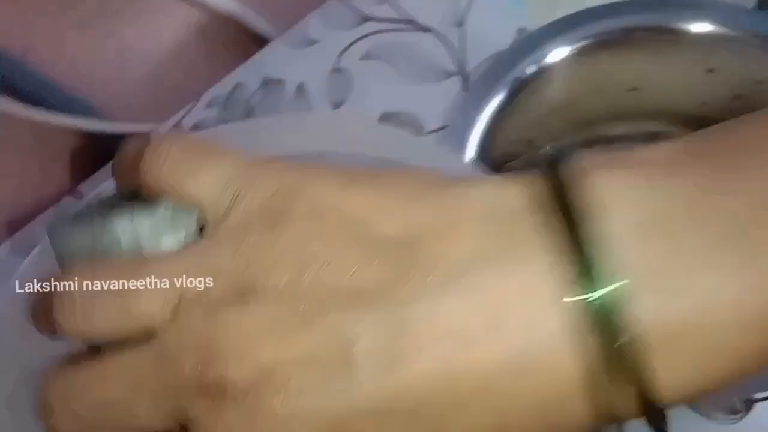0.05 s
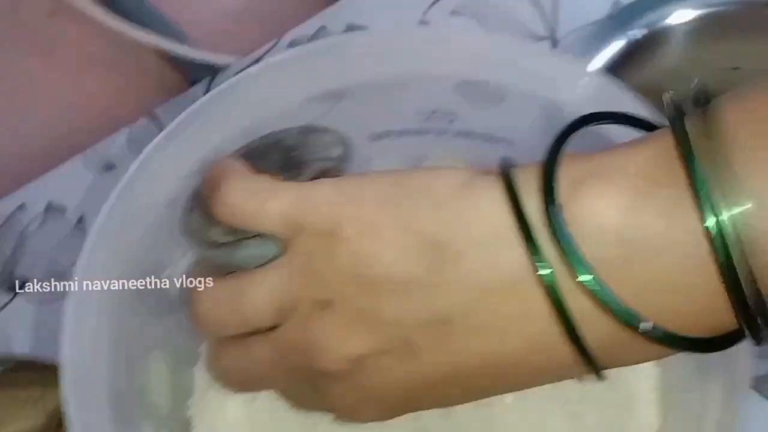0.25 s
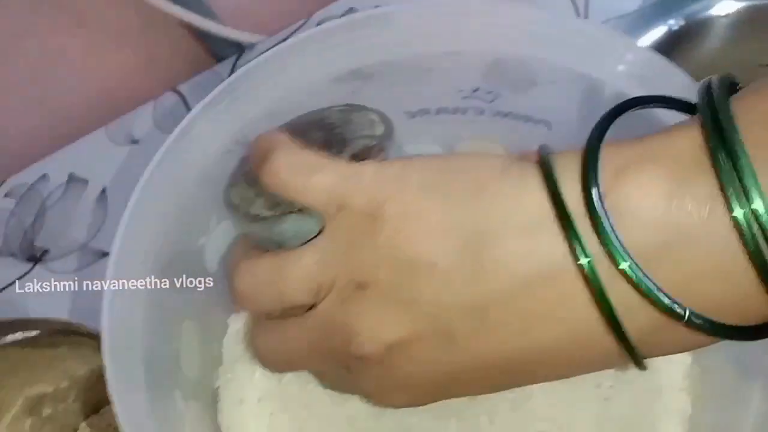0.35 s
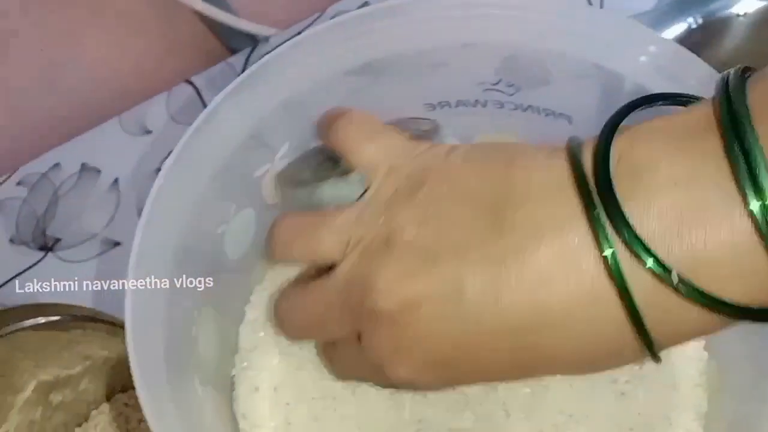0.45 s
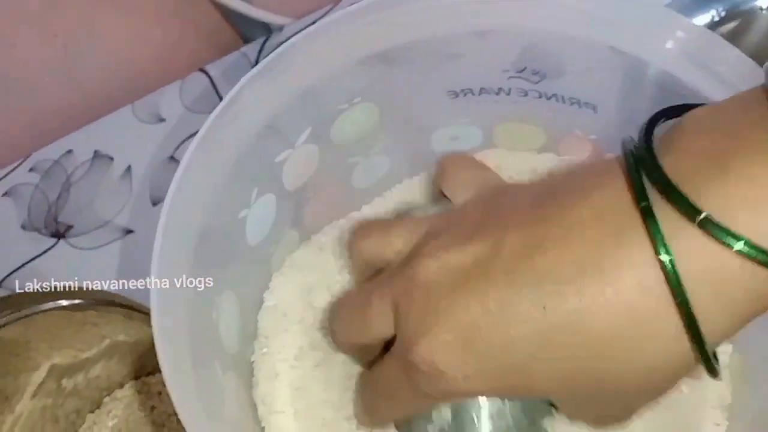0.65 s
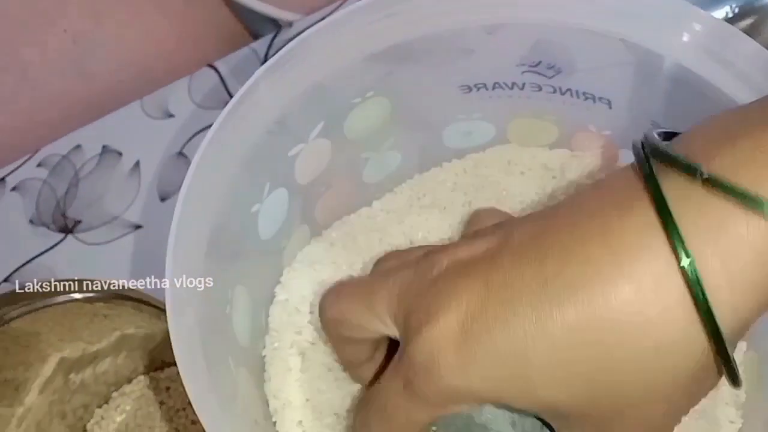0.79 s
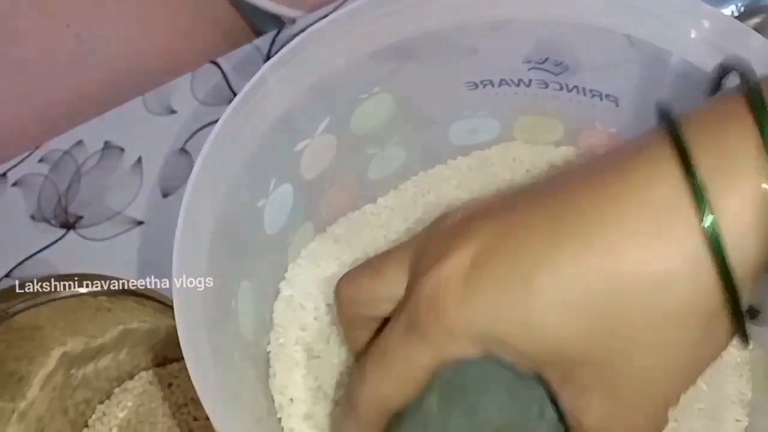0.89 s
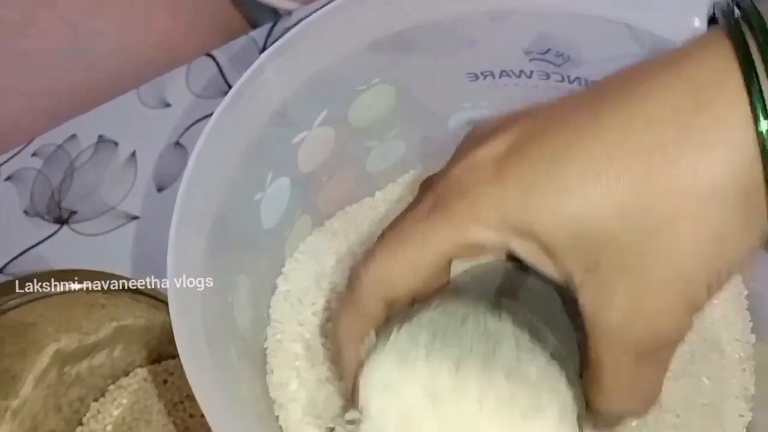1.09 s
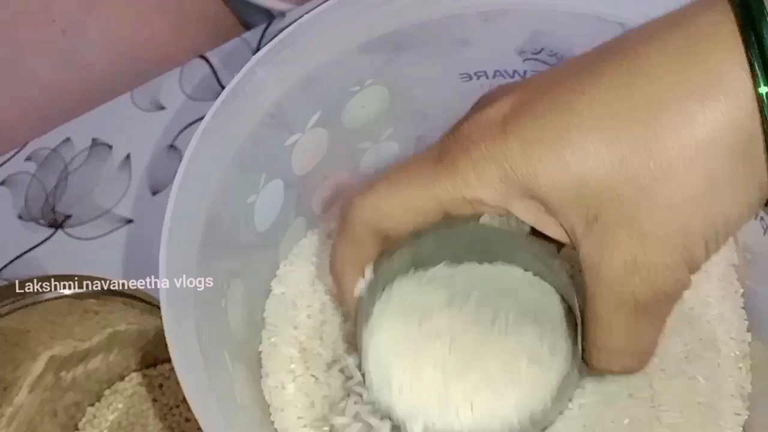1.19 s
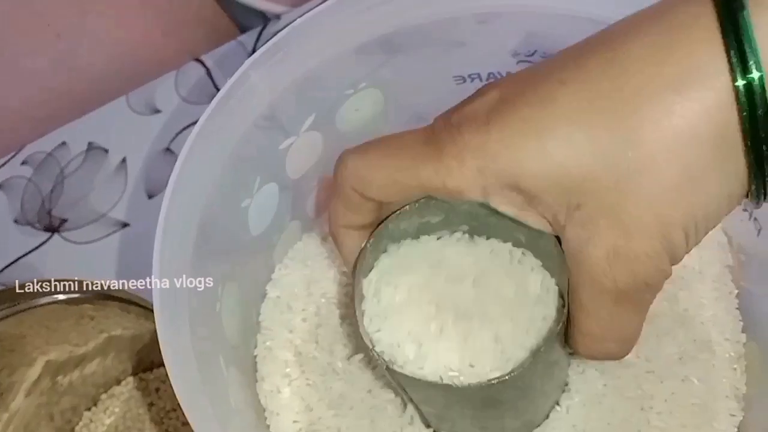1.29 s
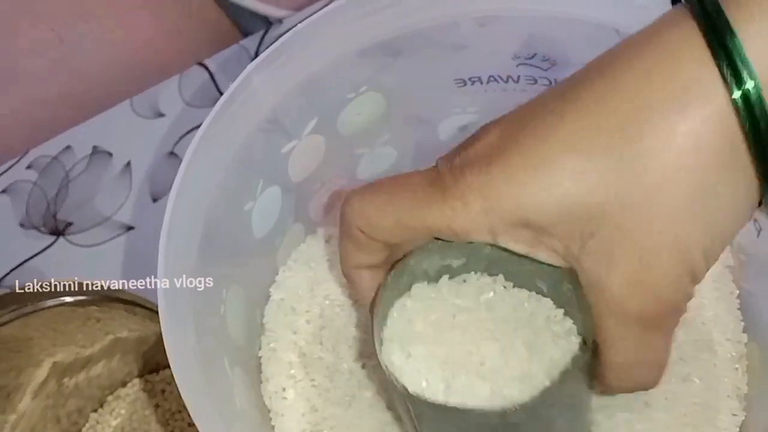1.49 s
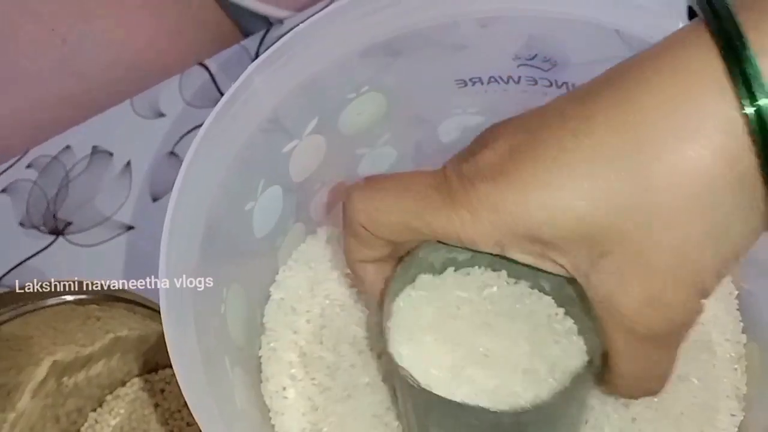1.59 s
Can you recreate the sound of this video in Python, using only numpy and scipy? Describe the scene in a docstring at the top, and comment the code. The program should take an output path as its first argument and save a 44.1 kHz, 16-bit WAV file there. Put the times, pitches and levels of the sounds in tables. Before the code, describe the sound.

Dry rice being scooped with a steel tumbler: a quick cluster of knocks on a plastic tub with bright bangle clinks, then crunching, hissing grains that rattle and spill back, close-miked in a small quiet kitchen.

```python
"""Steel tumbler scooping dry rice

Close by in a kitchen, a hand wearing glass bangles takes a steel tumbler into a plastic tub of dry rice.
Knocks are noise cracks with ringing modes of tumbler and tub; the bangles tick and ring as wavering partials.
Rice is made of random clicks: it crunches, scrapes the steel and tumbles as the tumbler fills and is lifted,
and the heaped grains slide off and drum back into the tub. A short room echo and faint air lie behind."""
import sys
import numpy as np
from scipy import signal
from scipy.fft import rfft, irfft, next_fast_len
from scipy.io import wavfile
from scipy.ndimage import uniform_filter1d

SR = 44100
rng = np.random.default_rng(int(sys.argv[2]) if len(sys.argv) > 2 else 0)


def output_pcm(signal):
    """Save a mono or channel-first signal as 16-bit PCM at the path in sys.argv[1].

    Samples are clipped to [-1, 1] before scaling.
    """
    pcm = np.clip(np.atleast_2d(signal).T, -1, 1) * 32767
    wavfile.write(sys.argv[1], SR, np.round(pcm).astype(np.int16))


N = 72765
TIME_S = np.arange(N) / SR
GRAINS_PER_S, CRUNCHES_PER_S, TUMBLES_PER_S = 9000, 4500, 5500


def undb(db):
    """Decibels to gain."""
    return 10 ** (np.asarray(db) / 20)


def unit(x):
    """Scale to rms 1."""
    return x / np.sqrt(np.mean(x ** 2))


def fade(t60):
    """Exponential decay that loses 60 dB in t60 seconds."""
    return np.exp(-np.log(1000) * TIME_S / max(t60, 1e-3))


def add(out, start, x):
    """Mix a sound in from its start time [s]."""
    i = max(int(start * SR), 0)
    out[i:] += x[:N - i]


def colour(x, points, tilt_db=0):
    """Causal filter of unit power through (frequency [Hz], level [dB]) points, tilted in dB per octave."""
    size = next_fast_len(2 * N, real=True)
    octave = np.log2(np.maximum(np.fft.rfftfreq(size, 1 / SR), 1))
    hz, db = np.array(points, float).T
    gain = unit(undb(np.interp(octave, np.log2(hz), db) + tilt_db * octave))
    # folding the cepstrum onto positive times gives minimum phase
    cepstrum = irfft(np.log(gain), size)
    cepstrum[1:size // 2] *= 2
    cepstrum[size // 2 + 1:] = 0
    response = np.exp(rfft(cepstrum, size))
    return irfft(rfft(x, size) * response, size)[:N]


def ring(hz, t60, phase=0):
    """One decaying mode, a sine that starts at rms 1."""
    return np.sqrt(2) * np.sin(2 * np.pi * hz * TIME_S + phase) * fade(t60)


def wander(hz):
    """Random values joined by straight lines, hz of them a second."""
    return np.interp(TIME_S * hz, np.arange(N), rng.standard_normal(N))


def curve(levels):
    """Gain through (time [s], level [dB]) points, silent up to the first."""
    at, db = np.array(levels).T
    return np.where(TIME_S > at[0], undb(np.interp(TIME_S, at, db)), 0)


def knocks():
    """Steel cracks on plastic, the tumbler rings briefly and the full tub thuds; a faint hollow tap comes first."""
    # knocks of the tumbler: (time [s], crack [dB], tub body [dB], brightness [dB per octave])
    knock_list = [(0.236, -16, -40, 0), (0.3234, -15.5, -48, -1), (0.3408, -17.5, -17.5, -5.5),
                  (0.3497, -18, -31.5, -2), (0.4101, -20, -49, 0), (0.414, -21.5, -34, -1),
                  (.421, -26.5, -33, -5), (0.4414, -12.5, -38.5, 0), (0.4465, -17, -34.5, -0.5),
                  (0.4622, -35.5, -63, -2.5), (.518, -23, -42.5, 3.5), (1.0754, -24.5, -46, -4.5),
                  (1.1082, -21, -53, -0.5)]
    # colour of a crack: (frequency [Hz], level [dB])
    crack_colour = [(100, -38), (300, -9.5), (700, -1), (1150, 1.5), (1900, -6), (2650, 1), (3100, -7.5),
                    (3600, -1.5), (4700, -8), (5700, -6), (8000, -13.5), (9500, -27), (15000, -16.5)]
    # modes of the loaded tub: (frequency [Hz], level before the brightness tilt [dB], t60 [s])
    tub_modes = [(105, -19, .08), (235, -14, .04), (338, -5, .07), (472, -5, .05), (568, -10, .05),
                 (1225, -14, .05)]
    # modes of the steel tumbler, damped by the hand: (frequency [Hz], level against the crack [dB], t60 [s])
    tumbler_modes = [(2003, -46, 0.54), (2850, -24, 0.077), (3480, -21.5, 0.053)]
    crack_t60_s = 0.015
    rattle_db, rattle_t60_s = -20, 0.26  # loose grains rattle on after each crack
    thud_low_hz, thud_high_hz, thud_db, thud_t60_s = 227, 537, 3.1, 0.045  # rice inside the struck tub
    tap_s, tap_hz, tap_db, tap_t60_s, tap_rise_s = 0.078, 602, -50, 0.04, 0.004

    out = np.zeros(N)
    thud_band = signal.butter(2, [thud_low_hz, thud_high_hz], "band", fs=SR, output="sos")
    shape = fade(crack_t60_s) + undb(rattle_db) * fade(rattle_t60_s)
    shape_rms = np.sqrt(np.mean(shape ** 2))
    for start, crack_db, body_db, tilt_db in knock_list:
        noise = rng.choice([-1., 1.], N) * shape
        crack = unit(colour(noise, crack_colour, tilt_db)) * shape_rms
        steel = np.zeros(N)
        for hz, db, t60 in tumbler_modes:
            steel += undb(db) * ring(hz, t60, 2 * np.pi * rng.random())
        body = np.zeros(N)
        for k, (hz, db, t60) in enumerate(tub_modes):
            tilted_db = db + tilt_db * np.log2(hz / thud_low_hz)
            body += undb(tilted_db) * ring(hz, t60, np.pi * k)  # neighbouring modes start in opposite phase
        thud = unit(signal.sosfilt(thud_band, rng.standard_normal(N)))
        thud = thud * undb(thud_db) * fade(thud_t60_s)
        add(out, start, undb(crack_db) * (crack + steel) + undb(body_db) * (body + thud))
    tap_rise = np.minimum(TIME_S / tap_rise_s, 1)
    add(out, tap_s, undb(tap_db) * ring(tap_hz, tap_t60_s) * tap_rise)
    return out


def bangles(detune=0.00071):
    """Glass rings tick, tick again on rebound and ring; the contact point decides which partials speak."""
    # modes by bangle: (frequency [Hz], level within its register [dB], t60 before damping [s])
    bangle_modes = {"small": [(5175, -6, .18), (9885, -3, .09), (9995, 0, .08), (15170, 0, .03)],
                    "medium": [(5872, 0, .1), (10665, -10, .05), (11140, 0, .08)],
                    "large": [(5040, -2, .12), (5872, 0, .1), (9573, -5, .09), (9895, 0, .09),
                    (15185, -7, .04), (15286, 0, .11), (15437, -9, .07)]}
    # clinks: (time [s], bangle, low partials [dB], middle partials [dB], top partials [dB])
    clinks = [(.004, "small", -61, -54.5, -53), (0.245, "small", -34, -36, -58),
              (.288, "small", -37, -40, -32), (.311, "small", -41, -45, -48),
              (0.3952, "medium", -38, -35, -41), (0.4136, "large", -33, -32.5, -27),
              (0.4428, "large", -43, -31.5, -24), (0.443, "medium", -35, -33, -39),
              (0.4573, "large", -38, -48, -21), (0.4631, "large", -35.5, -26, -22),
              (0.4898, "large", -48, -57, -28.5), (0.5171, "large", -43, -32, -19.5),
              (0.528, "medium", -37.5, -36.5, -37.5), (.953, "small", -63, -39.5, -46),
              (1.101, "large", -60, -36.5, -31.5), (1.197, "small", -43, -36.5, -41)]
    # tick of glass touching glass: (frequency [Hz], level [dB])
    tick_colour = [(8000, -10), (15000, 0)]
    register_edges_hz = (7500, 13000)
    tick_db, tick_t60_s = -7, 0.009  # level against the top partials
    rebound_s, rebound_db = 0.0092, 0
    # a bangle rings freely for a moment, until it settles against its neighbours
    rise_s, free_s, damped_t60_s = 0.0013, 0.033, 0.067
    # each partial wavers as the rings chatter against each other
    chatter_db, chatter_radians, chatter_hz = 2.5, 0.6, 220

    out, ticks = np.zeros(N), np.zeros(N)
    damping = np.exp(-np.log(1000) * np.maximum(TIME_S - free_s, 0) / damped_t60_s)
    touch = np.minimum(TIME_S / rise_s, 1) * damping
    for start, name, *register_db in clinks:
        for delay, db in (0, 0), (rebound_s, rebound_db):
            tick = rng.choice([-1., 1.], N) * fade(tick_t60_s)
            add(ticks, start + delay, undb(register_db[-1] + tick_db + db) * tick)
        for hz, db, t60 in bangle_modes[name]:
            register = np.searchsorted(register_edges_hz, hz)
            gain = undb(db + register_db[register] + chatter_db * wander(chatter_hz))
            phase = 2 * np.pi * rng.random() + chatter_radians * wander(chatter_hz)
            detuned_hz = hz * (1 + detune * rng.standard_normal())
            add(out, start, gain * touch * ring(detuned_hz, t60, phase))
    return out + colour(ticks, tick_colour)


def rice():
    """Packed rice crunches, grains scrape the steel and tumble loose, and the tub drums evenly under them."""
    return crunching() + scraping() + tumbling() + drumming()


def crunching():
    """The rim ploughs the packed rice; the crunch loses bass once the tumbler tips up out of it."""
    # level before the bass cut: (time [s], level [dB])
    crunch_level = [(.35, -59.5), (.56, -46), (.675, -38.5), (.715, -33.5), (.86, -39), (1.01, -38),
                    (1.08, -38), (1.17, -50.5), (1.27, -61), (1.38, -49), (1.44, -43.5), (1.515, -60.5),
                    (1.585, -42), (1.65, -47.5)]
    # colour: (frequency [Hz], level [dB])
    crunch_colour = [(50, -36.5), (120, -12), (185, -2.5), (330, 0.5), (600, -1), (790, 3.5), (950, -3.5),
                     (1150, -6), (1700, -15.5), (2500, -64)]
    tip_s, tip_length_s, bass_edge_hz, tipped_bass_db = 0.96, 0.04, 290, -11

    crunch = grains(crunch_colour, CRUNCHES_PER_S, spread_db=1.94) * curve(crunch_level)
    bass = signal.sosfiltfilt(signal.butter(4, bass_edge_hz, fs=SR, output="sos"), crunch)
    tipped = np.clip((TIME_S - tip_s) / tip_length_s, 0, 1)
    return crunch - bass + bass * undb(tipped_bass_db * tipped)


def scraping():
    """Grains scrape the steel wall, which sings faintly; the harder they press, the fuller the sound."""
    # level before the pressure thins the body: (time [s], level [dB])
    scrape_level = [(.32, -52), (.37, -37.5), (.56, -49.5), (0.608, -37.5), (0.668, -41.5), (0.715, -33.5),
                    (0.861, -35.5), (0.931, -31), (1., -38), (1.1, -42), (1.17, -46.5), (1.28, -40),
                    (1.37, -35), (1.45, -42), (1.53, -56.5), (1.65, -43.5)]
    # colour: (frequency [Hz], level [dB])
    scrape_colour = [(800, -29), (1500, -3.5), (3000, -8), (3800, 0.5), (4600, 0), (5300, -8.5),
                     (6300, 1.5), (7450, -4.5), (8300, -1), (9300, -13), (11400, -12), (12400, -4),
                     (13500, -4), (15200, -4)]
    wall_hz, wall_width_hz, wall_db = 7460, 110, -10  # level against the hiss, before pressure
    # under a light touch the scrape loses its body and mostly fine hiss is left
    body_top_hz, body_db_per_db = 6400, 0.5

    hiss = grains(scrape_colour, GRAINS_PER_S, spread_db=1.5, flutter_db=0.63, flutter_hz=162.7)
    hiss = hiss * curve(scrape_level)
    at, level_db = np.array(scrape_level).T
    pressure_db = np.interp(TIME_S, at, level_db - level_db.max())
    body = signal.sosfiltfilt(signal.butter(4, body_top_hz, fs=SR, output="sos"), hiss)
    resonance = signal.iirpeak(wall_hz, wall_hz / wall_width_hz, fs=SR)
    wall = unit(signal.lfilter(*resonance, hiss)) * np.std(hiss) * undb(wall_db)
    return hiss - body + (body + wall) * undb(body_db_per_db * pressure_db)


def tumbling():
    """Loose grains tumble into the tumbler and off its top, as fluttering clicks."""
    # level: (time [s], level [dB])
    tumble_level = [(.84, -51.5), (.94, -38), (.98, -33), (1.04, -30), (1.10, -32.5), (1.17, -40.5),
                    (1.28, -40.5), (1.35, -34), (1.41, -47), (1.49, -113), (1.565, -60), (1.615, -40),
                    (1.65, -44.5)]
    # colour: (frequency [Hz], level [dB])
    tumble_colour = [(150, -49), (700, -15.5), (1200, -28), (1550, 2), (3150, 4), (3500, -0.5), (4300, 0),
                     (5100, -2.5), (8000, -9.5), (9400, -24), (12500, -25), (15200, -4.5)]
    tumble = grains(tumble_colour, TUMBLES_PER_S, spread_db=3.0, flutter_db=0.5, flutter_hz=209.3)
    return tumble * curve(tumble_level)


def drumming():
    """The tub drums low under the rice: dense clicks through a bass colour, evened in level."""
    # level: (time [s], level [dB])
    drum_level = [(.66, -68), (.715, -49.5), (.95, -61), (1.02, -76), (1.10, -62), (1.205, -39),
                  (1.33, -41), (1.39, -62.5), (1.5, -59), (1.6, -61)]
    # colour: (frequency [Hz], level [dB])
    drum_colour = [(30, -23), (55, -12), (80, 4), (115, -1), (210, -15.5), (400, -58)]
    even_s = 0.03
    drum = grains(drum_colour, GRAINS_PER_S)
    local_power = uniform_filter1d(drum ** 2, int(even_s * SR))
    return drum / np.sqrt(local_power) * curve(drum_level)


def grains(spectrum, rate, spread_db=0, flutter_db=0, flutter_hz=0):
    """Random tiny collisions of uneven size, rate of them a second on average, coming in little slips."""
    struck = rng.random(N) < rate / SR
    sign = rng.choice([-1, 1], N)
    size = undb(spread_db * np.minimum(rng.exponential(size=N), 5))
    slips = undb(flutter_db * wander(flutter_hz))
    return unit(clumps(colour(struck * sign * size * slips, spectrum)))


def clumps(x):
    """Patches of the spectrum swell and sink at random from one clump of grains to the next."""
    depth_db, width_hz = 2.4, 400
    hz, _, frames = signal.stft(x, SR, nperseg=512)
    chance = rng.standard_normal(frames.shape)
    chance = uniform_filter1d(chance, int(width_hz / hz[1]), axis=0)
    chance = unit(uniform_filter1d(chance, size=3, axis=1))
    return signal.istft(frames * undb(depth_db * chance), SR)[1][:N]


def kitchen(x):
    """Short diffuse echo of a small hard room: decaying noise with a weaker treble that lasts slightly longer."""
    t60_s, treble_t60_s, treble_db, split_hz, gap_s = 0.3, 0.34, -7.0, 2600, 0.005
    noise = rng.standard_normal(N)
    low = signal.sosfilt(signal.butter(2, split_hz, fs=SR, output="sos"), noise)
    high = signal.sosfilt(signal.butter(2, split_hz, "high", fs=SR, output="sos"), noise)
    tail = np.zeros(N)
    add(tail, gap_s, low * fade(t60_s) - undb(treble_db) * high * fade(treble_t60_s))
    return signal.fftconvolve(x, tail)[:N] / np.linalg.norm(fade(t60_s))


def room_air():
    """Faint steady noise of the room, strongest in the bass."""
    # colour: (frequency [Hz], level [dB])
    air_colour = [(120, -2.5), (1000, -18), (15000, -29)]
    air_db = -77
    return undb(air_db) * colour(rng.standard_normal(N), air_colour)


def scene():
    """Knocks, clinks and rice close to the microphone in the quiet kitchen."""
    hits, clinks, grain = knocks(), bangles(), rice()
    # clinks and rice feed the room less than the knocks do
    sent = hits + undb(-5.5) * clinks + undb(-11) * grain
    echo = undb(-7) * kitchen(sent)
    return (hits + clinks + grain + echo + room_air())[None]


def record(dry):
    """The recorder drops the deep bass and cuts the top steeply."""
    bass_hz, top_hz = 55, 15520
    thin = signal.sosfilt(signal.butter(2, bass_hz, "high", fs=SR, output="sos"), dry)
    return signal.sosfilt(signal.ellip(12, .2, 80, top_hz, fs=SR, output="sos"), thin)


dry = scene()
out = record(dry)
output_pcm(out)
```